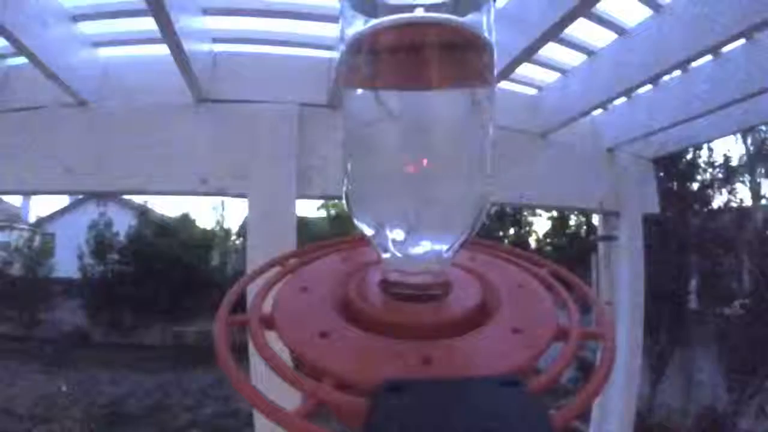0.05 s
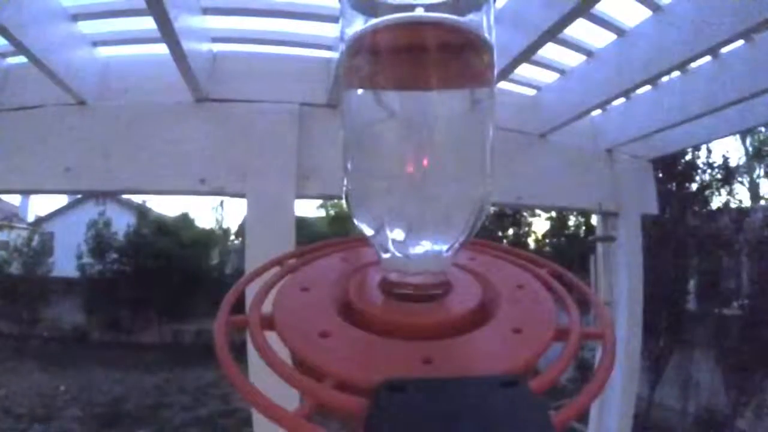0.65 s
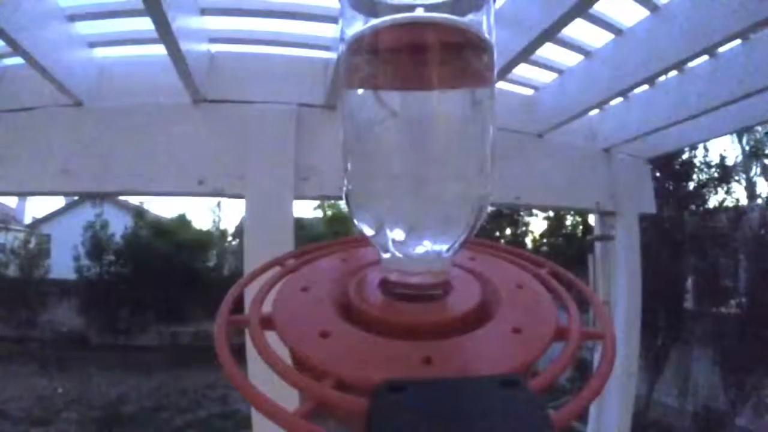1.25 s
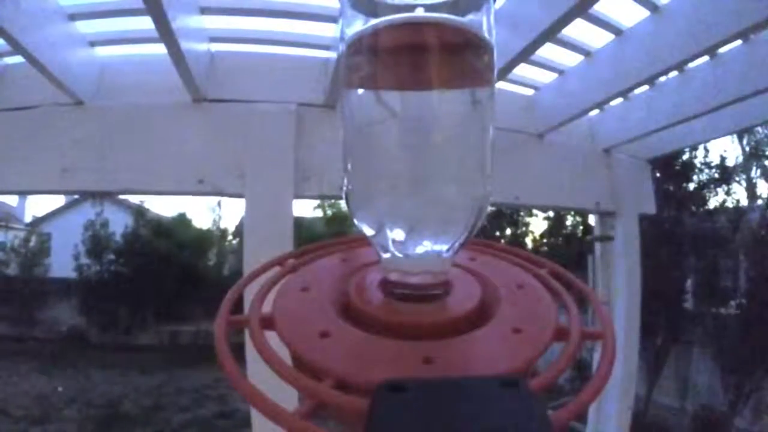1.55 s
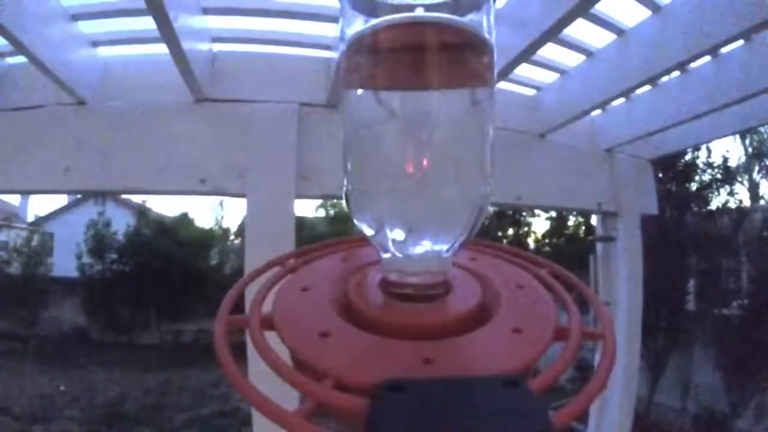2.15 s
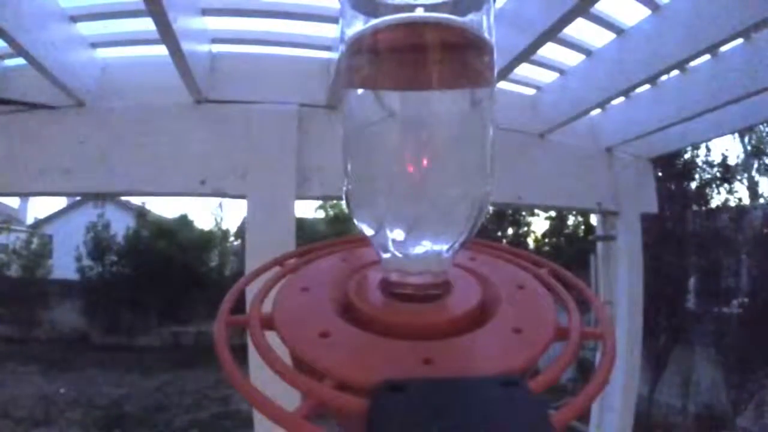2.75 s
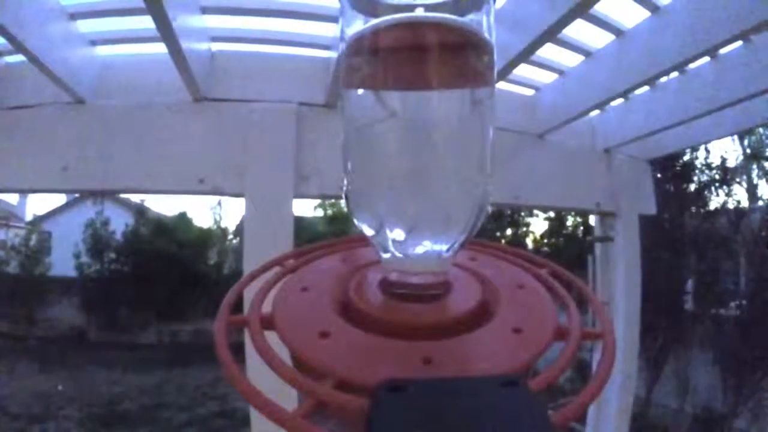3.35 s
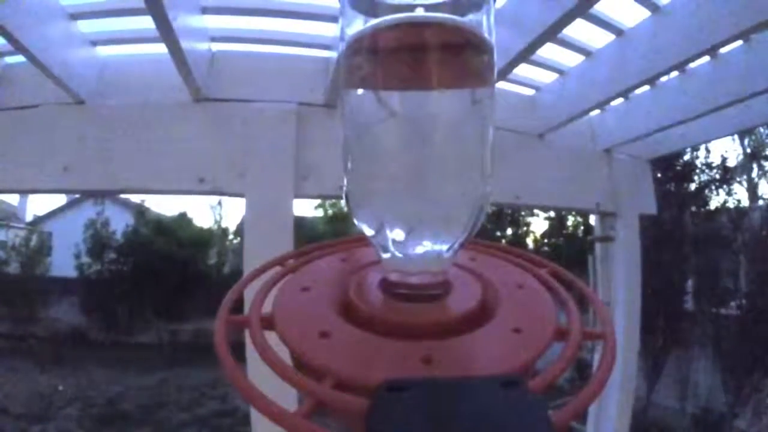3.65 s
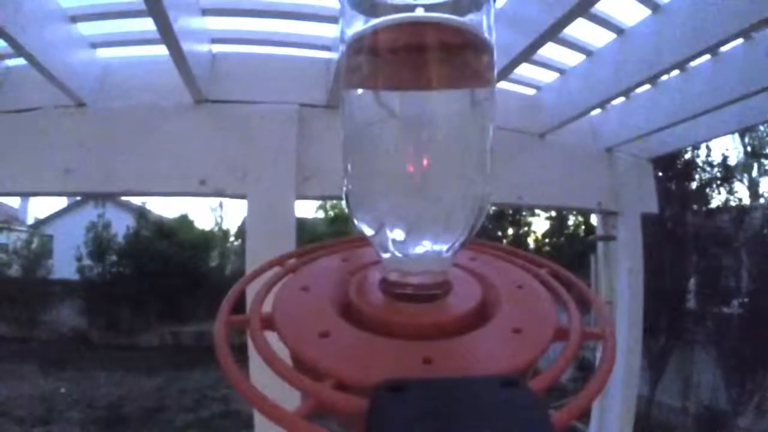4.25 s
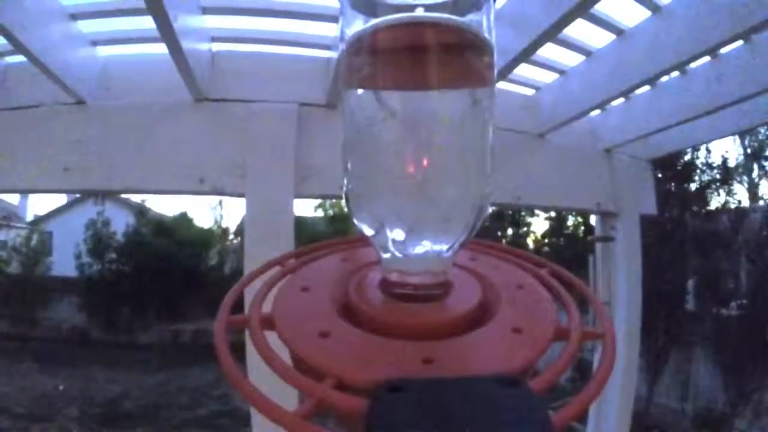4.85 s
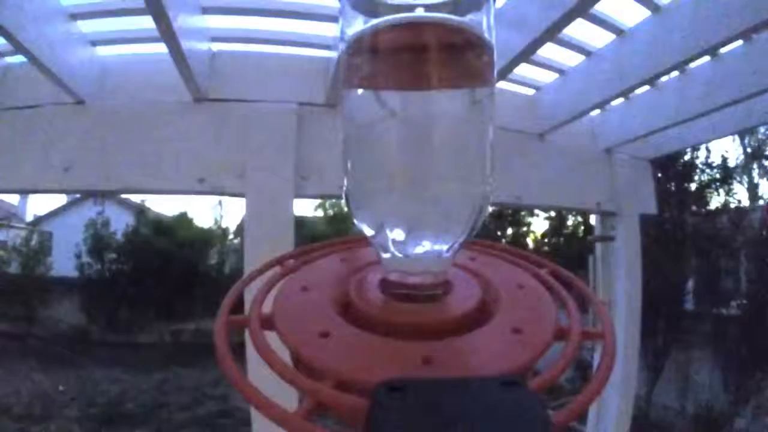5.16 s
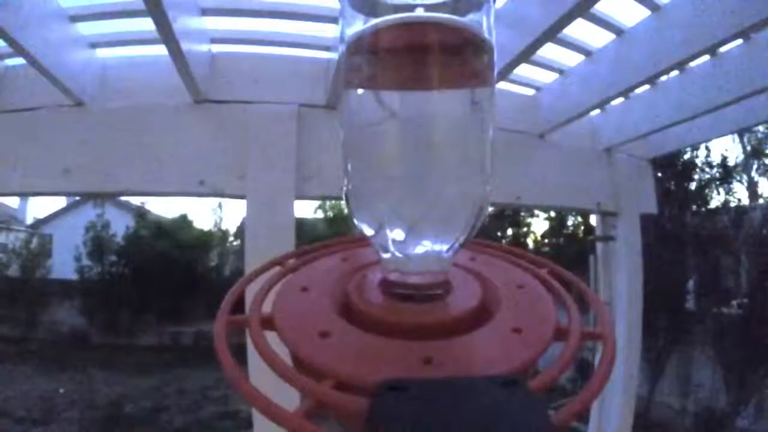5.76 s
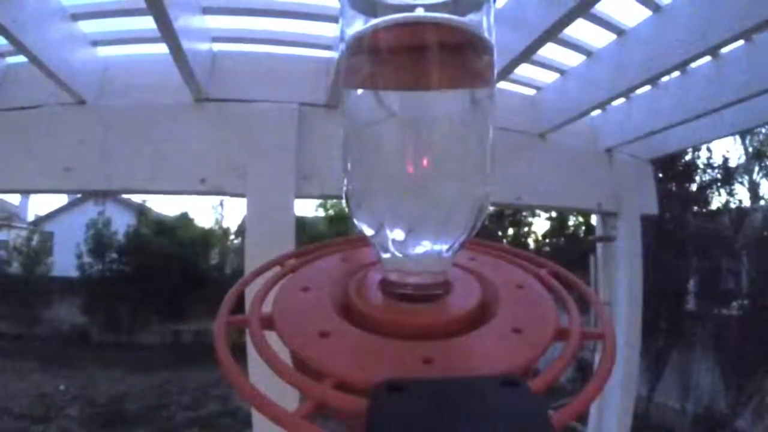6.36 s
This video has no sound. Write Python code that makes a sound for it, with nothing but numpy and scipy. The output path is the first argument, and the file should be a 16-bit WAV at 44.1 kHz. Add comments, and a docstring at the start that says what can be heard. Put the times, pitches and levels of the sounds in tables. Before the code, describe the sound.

Close bursts of buzzing hummingbird wings swell and drop away, with light feather swishes, above a yard's soft rumble and hiss.

```python
"""Hummingbird at a patio feeder

A hummingbird darts in and out, centimetres from a small camera. Each wingbeat pushes a pulse of air
at the microphone and makes the feathers swish; sharp turns add feather flicks and puffs of downwash.
Behind it a motor whines over the neighbourhood's hum. A limiter ducks the mix when the bird is closest."""
import sys
import numpy as np
from scipy import signal
from scipy.fft import rfft, irfft, next_fast_len
from scipy.io import wavfile
from scipy.ndimage import uniform_filter1d, minimum_filter1d

SR = 44100
rng = np.random.default_rng(int(sys.argv[2]) if len(sys.argv) > 2 else 0)


def generate_wav(sig):
    """Save sig (samples, or channels by samples) to the path in sys.argv[1] as 16-bit PCM at SR."""
    pcm = np.round(np.clip(np.atleast_2d(sig).T, -1, 1) * 32767).astype(np.int16)
    wavfile.write(sys.argv[1], SR, pcm)


N = 287091
TIME = np.arange(N) / SR

# colour of the neighbourhood bed: freq_hz, density_db
YARD_COLOUR = [(25, -16.5), (60, -3), (120, 3.5), (200, -4), (300, -5), (450, -16.5), (800, -14),
               (1150, -16.5), (1550, -29.5), (2300, -33), (3000, -36), (5000, -41.5), (8500, -49.5),
               (12000, -53), (14500, -61.5)]
# slow swell of that bed: time_s, level_db
YARD_SWELL = [(0, -36), (1.6, -35.5), (2.3, -37), (3.3, -38), (4.3, -37), (5.2, -37), (5.8, -37),
              (6.2, -38.5), (6.45, -37.5)]
# colour of the thin hiss on top: freq_hz, density_db
HISS_COLOUR = [(7000, -29.5), (9800, -7.5), (11500, -5.5), (13700, 5.5), (15000, -10)]
# partials of the motor whine: pitch_hz, rms_db
MOTOR_PARTIALS = [(649, -60), (1061.5, -58), (1120.6, -48), (1179.6, -62.5), (1238.7, -58.5), (1356.5, -83),
                  (1415.3, -75.5), (2123.7, -75.5), (2359.3, -78)]
# downwash hitting the microphone: centre_s, level_db, half_length_s
DOWNWASH_PUFFS = [(0.844, -27, 0.018), (1.669, -38, 0.021), (1.835, -35, 0.033), (3.067, -40, 0.0094),
                  (4.077, -37, 0.0093), (5.288, -31.5, 0.049), (5.889, -17, 0.0053), (5.916, -14.5, 0.0089),
                  (5.964, -23.5, 0.024)]
# colour of those puffs: freq_hz, density_db
DOWNWASH_COLOUR = [(30, -7), (100, 0), (200, -6.5), (400, -8), (700, -20), (1100, -26.5),
                   (1600, -41.5), (2300, -45.5), (4000, -57), (12000, -77.5)]
# feathers flicking in sharp turns: centre_s, level_db, pitch_hz
FEATHER_FLICKS = [(0.823, -53, 3620), (.844, -50, 4970), (1.065, -47, 5500), (1.087, -52, 5450),
                  (1.525, -55, 5170), (4.56, -47.5, 3620), (5.894, -56.5, 2784), (5.909, -52, 3630),
                  (5.951, -41.5, 1940), (5.983, -53, 3580), (6.073, -50, 3700)]
# feather noise, coloured by the camera housing: freq_hz, density_db
FEATHER_COLOUR = [(1500, -4.5), (2300, -3), (3050, -17), (3550, 3.5), (4400, -7), (5300, 0.5), (6200, -6),
                  (7000, -2), (9200, -13.5), (10200, -10.5), (11300, -16.5), (12600, -16), (15000, -27)]
# swishes within one beat: place_cycles, half_width_cycles, gain_db
SWISH_STROKES = [(-.07, .09, -1.8), (-.33, .08, -7), (.28, .08, -12)]
# the bird comes close, hovers, backs off: arrive_s, leave_s, level_db, extra_edge_db, extra_swish_db
FEEDER_VISITS = [(0.199, 0.626, -25.5, 3, -5), (0.665, 1.109, -18, -1, 4), (1.174, 1.731, -19, 1.5, 5.5),
                 (3.633, 4.389, -27, 0, 1.5), (4.489, 5.357, -15, -1, 3), (5.435, 6.137, -17.5, -1.5, 2),
                 (6.277, 6.6, -23.5, -1.5, -0.5)]
# base level of the wings between visits: time_s, level_db
DISTANT_LEVEL = [(0.0, -40), (1.101, -29), (1.908, -26.5), (2.383, -29), (2.584, -32.5), (3.316, -31),
                 (3.587, -34), (4.4, -31), (5.398, -26.5), (6.203, -31)]
# it beats harder to brake, turn or take off, or eases briefly: centre_s, change_db, half_length_s
EFFORT_SURGES = [(0.298, 4.5, 0.041), (0.428, -3.5, 0.02), (0.817, 5, 0.036), (1.069, 8, 0.014),
                 (1.257, 2, 0.024), (1.654, 4, 0.023), (1.812, 4, 0.043), (2.458, 3.5, 0.034),
                 (3.04, -4.5, 0.026), (3.09, 4, 0.01), (4.091, 5, 0.0076), (4.562, 2.5, 0.03),
                 (4.69, -4.0, 0.0308), (5.064, 5.5, 0.013), (5.126, -2.02, 0.018), (5.261, 5.5, 0.046),
                 (5.912, 10, 0.051), (6.033, -5, 0.0082), (6.073, 8, 0.011)]
# wingbeat rate in easy hovering: time_s, rate_hz
EASY_BEAT_RATE = [(0.0, 44.16), (0.264, 44.84), (0.818, 48.29), (0.872, 43.94), (1.039, 45.5),
                  (1.579, 41.53), (1.761, 49.47), (2.104, 40.97), (2.413, 44.76), (2.635, 41.6),
                  (3.38, 40.86), (4.269, 41.18), (4.464, 44.5), (4.825, 39.95), (5.201, 39.92),
                  (5.671, 38.99), (6.115, 43.07), (6.5, 40.25)]
# how far the bird turns side-on, where both half-strokes push alike: time_s, side_on_fraction
SIDE_ON_TURNS = [(1.82, 0.2), (1.9, 0.86), (2.2, 0.2), (2.45, 0.95), (3.04, 0.86), (3.1, 0.07),
                 (3.58, 0.03), (3.7, 0.74), (4.3, 0.25), (4.5, 0.06), (5.78, 0.08), (5.88, 0.7), (5.94, 0)]
# base tone of a wing pulse: freq_hz, gain_db
PULSE_COLOUR = [(80, 2), (130, -0.15), (175, -3.5), (220, -7.5), (265, -13.5), (310, -17.5), (355, -20),
                (440, -26), (520, -39), (700, -46.5), (1000, -46.5)]


def from_db(db):
    """Decibels to gain."""
    return 10 ** (np.asarray(db) / 20)


def automation(points):
    """A curve of breakpoints read at every sample."""
    return np.interp(TIME, *np.transpose(points))


def bump(centre_s, half_length_s):
    """A bell-shaped swell of height 1."""
    return np.exp(-.5 * ((TIME - centre_s) / half_length_s) ** 2)


def colour_db(colour, hz):
    """An EQ curve read on a log-frequency axis."""
    freqs, db = np.transpose(colour)
    return np.interp(np.log(np.maximum(hz, 1)), np.log(freqs), db)


def noise(colour):
    """Coloured noise of rms 1."""
    size = next_fast_len(N)
    hz = np.arange(size // 2 + 1) * SR / size
    x = irfft(rfft(rng.standard_normal(size)) * from_db(colour_db(colour, hz)), size)[:N]
    return x / np.std(x)


def drift(rate_hz):
    """A slow random modulator of spread 1."""
    step, settle = 40, 2000
    pole = np.exp(-2 * np.pi * rate_hz * step / SR)
    white = rng.standard_normal(N // step + settle + 2)
    slow = signal.lfilter([1], [1, -2 * pole, pole * pole], white)[settle:]
    return np.interp(np.arange(N) / step, np.arange(len(slow)), slow / np.std(slow))


def per_beat(cycles):
    """A fresh random value for every wingbeat, with glides between."""
    return np.interp(cycles, np.arange(400), rng.standard_normal(400))


def beat_offset(cycles, place):
    """Signed distance in cycles from a place in the beat."""
    return (cycles - place + .5) % 1 - .5


def neighbourhood(hiss_db):
    """The bed: a gently swelling rumble with a thin, steady hiss on top."""
    return from_db(automation(YARD_SWELL)) * noise(YARD_COLOUR) + from_db(hiss_db) * noise(HISS_COLOUR)


def motor(waver_db, pitch_wander):
    """A whine with sidebands spaced by the shaft rate, wavering on its way across the yard."""
    clock = TIME + pitch_wander * np.cumsum(drift(2.3)) / SR
    whine = np.zeros(N)
    for hz, db in MOTOR_PARTIALS:
        gain = np.sqrt(2) * from_db(db + waver_db * drift(4.2))
        whine += gain * np.sin(2 * np.pi * (hz * clock + rng.random()))
    return whine


def downwash():
    """Short, dull lumps of turbulence on the microphone port."""
    puffs = sum(from_db(db) * bump(s, half_s) for s, db, half_s in DOWNWASH_PUFFS)
    return puffs * noise(DOWNWASH_COLOUR)


def feather_flicks(half_length_s, band_ratio):
    """A feather snaps through the air: a few milliseconds of hiss around one pitch."""
    flicks = np.zeros(N)
    for s, db, hz in FEATHER_FLICKS:
        band = signal.butter(2, [hz / band_ratio, hz * band_ratio], "band", fs=SR, output="sos")
        hiss = signal.sosfilt(band, rng.standard_normal(N))
        flicks += from_db(db) * bump(s, half_length_s) * hiss / np.std(hiss)
    return flicks


def wingtip_thumps(cycles, centre_s, half_length_s, level_db):
    """A wingtip sweeps past the microphone on the return stroke: a push with suction either side."""
    away = beat_offset(cycles, place=.39) / .16
    push = (1 - away ** 2) * np.exp(-.5 * away ** 2)
    return from_db(level_db) * bump(centre_s, half_length_s) * push


def feather_swish(cycles, level_db, swish_db, trim_db):
    """Air hisses through the feathers while each stroke is at full speed."""
    gate = sum(from_db(db) / (1 + (beat_offset(cycles, place) / width) ** 4)
               for place, width, db in SWISH_STROKES)
    gain_db = trim_db + swish_db + .67 * level_db + .7 * per_beat(cycles)
    return noise(FEATHER_COLOUR) * gate * from_db(gain_db)


def presence(arrive_s, leave_s):
    """How fully the bird is at the feeder, 0-1: it glides in and leaves abruptly."""
    fade_in = .5 * (1 + np.tanh((TIME - arrive_s) / .03))
    fade_out = .5 * (1 - np.tanh((TIME - leave_s) / .0088))
    return fade_in * fade_out


def flight():
    """Wing automation: visits bring the bird close; effort makes it louder, sharper and faster."""
    distant_db = automation(DISTANT_LEVEL)
    effort_db = sum(db * bump(s, half_s) for s, db, half_s in EFFORT_SURGES)
    rate_hz = automation(EASY_BEAT_RATE) + .577 * effort_db
    level_db = distant_db + effort_db
    edge_db = np.minimum(.67 * effort_db, 3)
    swish_db = np.zeros(N)
    for arrive_s, leave_s, close_db, extra_edge_db, extra_swish_db in FEEDER_VISITS:
        close = presence(arrive_s, leave_s)
        level_db += close * (close_db - distant_db)
        edge_db += close * extra_edge_db
        swish_db += close * extra_swish_db
        rate_hz -= 5.19 * bump(leave_s + .02, .0236)   # the wings slacken just after leaving
    edge_db += np.minimum(1.5 + .68 * (level_db + 20), 3)   # closer wings have a sharper edge
    return rate_hz, level_db, edge_db, swish_db


def wing_pulses(cycles, rate_hz, level_db, edge_db, lean_rad, trim_db):
    """The hum, one pressure pulse a beat: suction, a fast push, a slower fall."""
    side_on = automation(SIDE_ON_TURNS)
    # side-on, the edge softens and the weight moves from the fundamental to the octave
    edge_db = edge_db - 8 * side_on + 1.98 * per_beat(cycles)
    facing_db = {1: 2 - 10 * side_on, 2: -1.3 + 4.5 * side_on, 3: side_on}
    hum = np.zeros(N)
    for harmonic in range(1, 21):
        hz = harmonic * rate_hz
        edge_share = np.clip((hz - 125) / 170, 0, 1)   # only the upper overtones carry the edge
        gain_db = colour_db(PULSE_COLOUR, hz) + edge_share * edge_db + facing_db.get(harmonic, 0)
        hum += from_db(gain_db) * np.cos(2 * np.pi * harmonic * cycles - lean_rad)
    return hum * from_db(level_db + trim_db + 1.04 * per_beat(cycles))


def scene():
    """The mono mix: the bird up front, the yard behind."""
    rate_hz, level_db, edge_db, swish_db = flight()
    cycles = np.cumsum(rate_hz) / SR + .086
    cycles += .012 * per_beat(cycles)   # no two beats are timed quite alike
    bird = wing_pulses(cycles, rate_hz, level_db, edge_db, lean_rad=.42, trim_db=-2.02)
    bird += feather_swish(cycles, level_db, swish_db, trim_db=-43.5)
    bird += feather_flicks(half_length_s=.0015, band_ratio=1.18)
    bird += wingtip_thumps(cycles, centre_s=5.92, half_length_s=.027, level_db=-1.5)
    bird += downwash()
    yard = neighbourhood(hiss_db=-85.5) + motor(waver_db=.96, pitch_wander=.000537)
    return (bird + yard)[None]


def limiter(x, ceiling_db, hold_s, release_db_per_s):
    """Peaks over the ceiling duck the gain at once; it holds, then creeps back."""
    over_db = np.maximum(20 * np.log10(np.abs(x[0]) + 1e-9) - ceiling_db, 0)
    half_hold = int(hold_s * SR / 2)
    held_db = -minimum_filter1d(-over_db, size=2 * half_hold + 1, origin=half_hold)
    release_db = release_db_per_s * TIME
    duck_db = np.maximum.accumulate(held_db + release_db) - release_db
    smooth_gain_db = uniform_filter1d(minimum_filter1d(-duck_db, size=200), size=200)
    return x * from_db(smooth_gain_db)


def record(dry):
    """The camera's chain: the microphone opens, the limiter rides the peaks, the top is cut."""
    opens_s, fade_s, cutoff_hz = .071, .0043, 15900
    muted = 1 - np.clip((TIME - opens_s) / fade_s, 0, 1)
    limited = limiter(dry * from_db(-45 * muted), ceiling_db=-.67, hold_s=.16, release_db_per_s=15.5)
    high_cut = signal.cheby2(12, 70, cutoff_hz, fs=SR, output="sos")
    return signal.sosfilt(high_cut, limited)


dry = scene()
out = record(dry)
generate_wav(out)
```